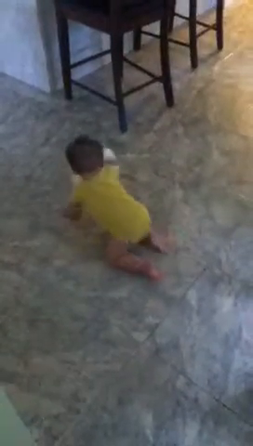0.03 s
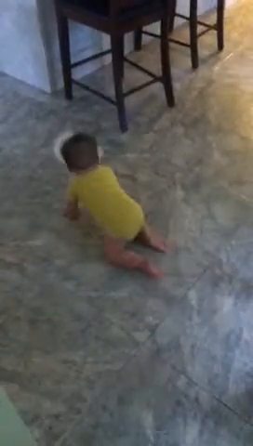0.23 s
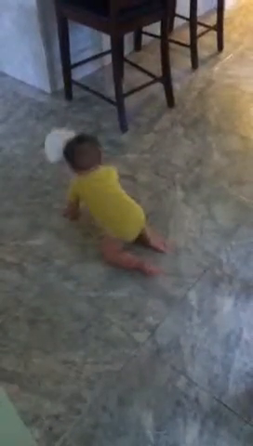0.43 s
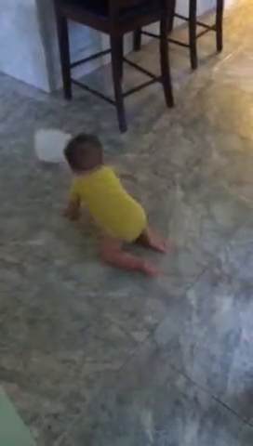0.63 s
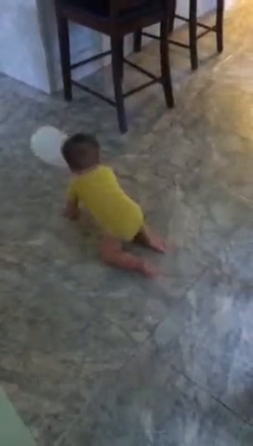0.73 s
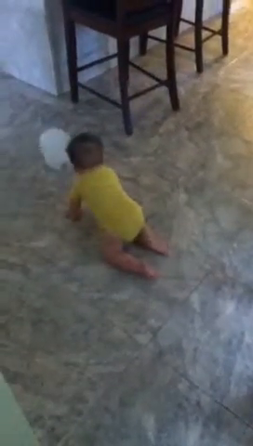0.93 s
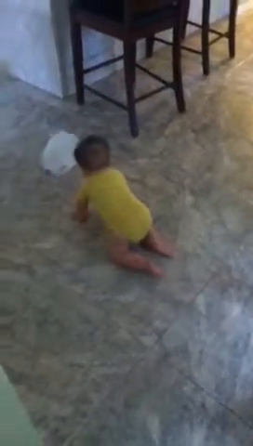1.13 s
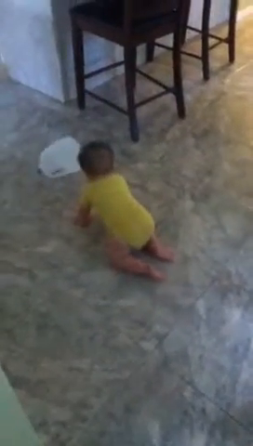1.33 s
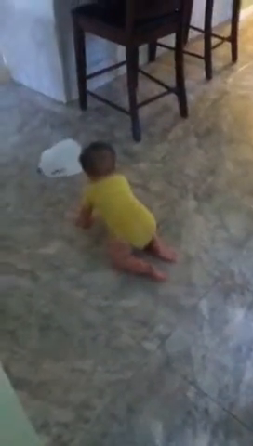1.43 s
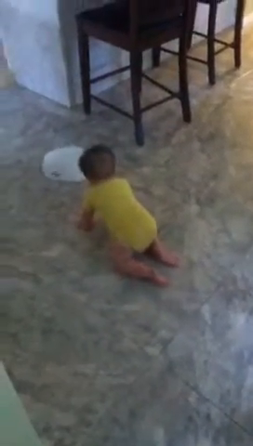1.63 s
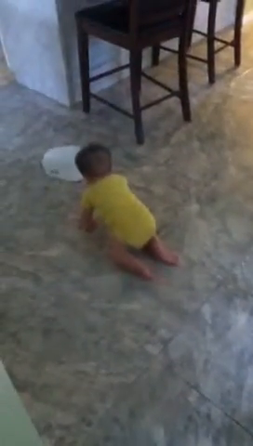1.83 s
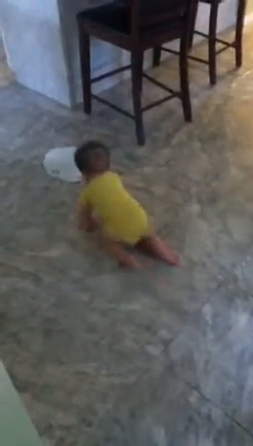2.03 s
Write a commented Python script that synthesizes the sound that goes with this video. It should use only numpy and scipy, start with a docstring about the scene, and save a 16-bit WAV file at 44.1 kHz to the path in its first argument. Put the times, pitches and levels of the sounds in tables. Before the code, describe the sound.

Dried beans rattle inside a plastic jug, starting suddenly at about 0.2 seconds as it rolls over concrete. Loud surges with sharp clacks and hollow bumps continue until 1 second. The jug then swings round more quietly, with a gritty scrape, a faint sinking tone and a few clacks. From 1.5 seconds it settles with tiny scuffs, and the room's echo fades to a faint low hum by 2 seconds.

```python
"""A jug of beans on concrete

A plastic jug with dried beans in it is pushed over a concrete floor in a hard, ringing room.
The beans tumble against its wall in surges, bright when they fall and duller when they slide.
The jug bumps and booms hollowly, swings round and comes to rest. The echo fades to a low hum."""
import sys
import numpy as np
from scipy import signal
from scipy.io import wavfile

SR = 44100
rng = np.random.default_rng(int(sys.argv[2]) if len(sys.argv) > 2 else 0)


def wav_record(signal):
    """Record a signal, one row per channel, as 16-bit PCM in the file named by sys.argv[1]."""
    frames = np.transpose(np.atleast_2d(signal))
    bounded = np.clip(frames, -1, 1)
    # unit amplitude maps onto the largest positive 16-bit level
    quanta = np.round(bounded * 32767).astype(np.int16)
    wavfile.write(sys.argv[1], SR, quanta)


N = 92610
T = np.arange(N) / SR
START_S = 0.2196   # the push that sets the jug rolling
BAND_EDGES_HZ = np.append(np.geomspace(25, 4500, 20), [5700, 7200, 8800, 10500, 12200, 14000, 16500])
BAND_CENTRES_HZ = np.sqrt(BAND_EDGES_HZ[1:] * BAND_EDGES_HZ[:-1])
HITS_PER_S = 2200   # bean hits when the tumbling is at its loudest


# How the beans tumble: (time [s], level [dB], brightness [dB per octave])
TUMBLE = [(.22, -21.5, -1), (.24, -21.5, 0), (.275, -12, -0.4), (.325, -13, -3), (.36, -12, -0.25),
          (.455, -14, -0.7), (.49, -20.5, -5.5), (.57, -16, -1.5), (.645, -18.5, 1), (.675, -11.5, -0.1),
          (.72, -11, 0.1), (.765, -17, -.2), (.83, -16, -0.5), (.875, -12.5, 1.5), (.91, -18, -0.3),
          (.99, -17, -0.5), (1.06, -25, -1.1), (1.14, -23, 0), (1.2, -23.5, -0.3), (1.275, -23.5, -1.5),
          (1.34, -24, 0), (1.42, -27, -0.8), (1.48, -36.5, -1.5), (1.62, -41, -2.5), (1.85, -69.5, 8.5)]
def beans(showers_db, spots):
    """Beans land on one of several spots on the wall. Harder tumbling gives more and louder ticks."""
    level_db, brightness = curves(TUMBLE)
    per_s = HITS_PER_S / spots * from_db(0.3 * (level_db - level_db.max()))
    strength = from_db(level_db + showers_db - 3) * (T >= START_S)
    hits = clicks(per_s, spread_db=2.5) * strength + clacks()
    return bean_ticks(hits, brightness) / np.sqrt(spots)


# Hard clacks that stand out from the rattle: (time [s], level [dB])
CLACKS = [(0.266, 2.5), (0.339, -24), (0.402, -4), (0.6146, -8), (0.66, -11), (0.709, -1), (0.721, -2),
          (.882, -7), (1.1568, -14), (1.202, -4), (1.2922, -3), (1.3377, -2.5), (1.366, -14)]
def clacks():
    """A bean hits hard: a burst of clicks so short that it sounds like one clack."""
    bursts = sum(from_db(db - 12) * fade_from(start, decay_s=0.0025) for start, db in CLACKS)
    return clicks(HITS_PER_S, spread_db=0) * bursts


# The tone of a bean striking the wall: (frequency [Hz], level [dB])
BEAN_TONE = [(250, -4.5), (400, -4), (550, -5.5), (800, 3), (1100, -1.5), (1450, 3), (2000, -1),
             (3000, -0.5), (4000, -3), (5100, -6), (6400, -10), (8000, -11.5), (9600, -14.5), (11300, -20),
             (13000, -25.5), (15200, -36)]
def bean_ticks(hits, brightness, pivot_hz=1940, spread_db=3.0):
    """Each hit on the plastic becomes a tick with its own random mix of low and high sound."""
    when = np.flatnonzero(hits)
    out, power = 0, 0
    for low, high, hz in zip(BAND_EDGES_HZ, BAND_EDGES_HZ[1:], BAND_CENTRES_HZ):
        if hz > BEAN_TONE[0][0]:
            chance = rng.uniform(-1, 1, N)[when]
            colour = np.sign(chance) * unit_level(from_db(spread_db * np.sqrt(12) * abs(chance)))
            tilt = from_db(brightness[when] * np.log2(hz / pivot_hz))   # a seesaw of bass and treble
            ticks = np.zeros(N)
            ticks[when] = hits[when] * colour * tilt
            gain = from_db(at_hz(BEAN_TONE, hz))
            out = out + gain * band(ticks, low, high)
            power += gain ** 2 * (high - low) * 2 / SR
    return out / np.sqrt(power)


# How hard the rolling jug drums on the floor: (time [s], level [dB])
ROLLING = [(.218, -22.5), (.25, -21.5), (.33, -30.5), (.38, -21.5), (.5, -21.5), (.6, -22), (.72, -24.5),
           (.87, -21.5), (.93, -30.5), (1.08, -35), (1.22, -31), (1.38, -41), (1.47, -53), (1.63, -44.5),
           (1.75, -63)]
# The notes of the hollow jug: (pitch [Hz], level [dB], time to fade by 60 dB [s])
JUG_NOTES = [(132.5, -12.5, 0.3), (163.6, -3.5, 0.34), (207.7, -1, 0.15), (247.6, 0.5, 0.3),
             (275, -5.5, 0.58), (309.3, 4, 0.31), (358.6, -1, .2), (400.3, 1.5, 0.14), (431, -20.5, 0.38),
             (604, -19, 0.22), (794.7, -2.5, 0.56), (1309, -19.5, 0.16), (1583, -18.5, 0.062)]
def jug_ring():
    """The small knocks of rolling keep the hollow jug ringing."""
    knocks = clicks(per_s=500, spread_db=2.5) * from_db(curves(ROLLING)[0]) * (T >= START_S)
    out = 0
    for hz, db, ring_s in JUG_NOTES:
        kept = from_db(-60 / (ring_s * SR))   # share of the ring left after one sample
        angle = 2 * np.pi * hz / SR
        gain = np.sin(angle) * np.sqrt(2 * (1 - kept ** 2))
        feedback = [1, -2 * kept * np.cos(angle), kept ** 2]
        pushes = knocks * rng.standard_normal(N) + 1e-18
        out = out + from_db(db) * signal.lfilter([0, gain], feedback, pushes)
    cut_rumble = signal.butter(4, 115, "high", fs=SR, output="sos")
    return signal.sosfilt(cut_rumble, out) / np.sqrt(len(JUG_NOTES))


# Low tones that start and fade: (time [s], level [dB], pitch [Hz], time to fade by 60 dB [s])
LOW_TONES = [(0.221, -14, 214, 0.055), (0.24, -18.5, 251, 0.14), (0.291, -13.5, 269, 0.088),
             (0.339, -22, 168, 0.67), (0.44, -19, 213, 0.078), (.436, -12, 442.5, .18),
             (0.497, -10, 327, 0.081), (0.506, -9, 446.6, 0.09), (.533, -9, 228.7, 0.11),
             (0.572, -15, 208, 0.11), (.648, -26, 145.6, 0.14), (.652, -14, 220, 0.1),
             (0.679, -19.5, 160, 0.17), (.718, -14.5, 315, 0.33), (0.787, -21.5, 151.6, 0.18),
             (.835, -12.5, 317, 0.22), (1.205, -20.5, 309, 0.22), (1.48, -49, 95.1, 0.96),
             (1.598, -37, 260, .15)]
def low_tones(rise_s=0.0056):
    """The jug's brief booms as it bumps along, and a faint low hum near the end."""
    out = 0
    for start, db, hz, ring_s in LOW_TONES:
        age = np.maximum(T - start, 0)
        shape = (1 - np.exp(-age / rise_s)) * fade_from(start, ring_s / np.log(1000))
        out = out + from_db(db) * shape * np.sin(2 * np.pi * hz * age)
    return out


# The note of the swinging jug: (time [s], pitch [Hz], level [dB])
RIM_NOTE = [(1.04, 309.9, -45.5), (1.13, 300.7, -34.5), (1.2, 296.2, -40), (1.28, 269.5, -35.5),
            (1.36, 276, -33.5), (1.45, 265, -45), (1.52, 266, -59)]
# The tones inside that note: (multiple of the pitch [ratio], level [dB])
RIM_TONES = [(.5, -9), (1, 0.5)]
def rim_swing(roughness=0.38, waver_hz=30):
    """The hollow wall sings a slightly rough, sinking note as the jug swings round on its rim."""
    hz, db = curves(RIM_NOTE)
    phase = 2 * np.pi * np.cumsum(hz) / SR
    smooth = signal.butter(2, waver_hz, fs=SR, output="sos")
    out = 0
    for multiple, tone_db in RIM_TONES:
        swell, slip = roughness * unit_level(signal.sosfilt(smooth, rng.standard_normal((2, N))))
        out = out + from_db(db + tone_db) * (1 + swell) * np.sin(multiple * phase + slip)
    return out * (T > RIM_NOTE[0][0]) * (T < RIM_NOTE[-1][0])


# Short, gritty scrapes: (time [s], level [dB], decay time [s], middle frequency [Hz])
SCRAPES = [(1.076, -26.5, 0.066, 1560), (1.715, -46.5, 0.074, 1324), (1.905, -49.5, 0.048, 2120)]
def scrapes(width_ratio=1.35):
    """Beans slide along the wall as the jug swings, then come faint scuffs as it settles."""
    grit = clicks(per_s=2000, spread_db=6.5)
    out = 0
    for start, db, decay_s, hz in SCRAPES:
        scrape = unit_level(band(grit, hz / width_ratio, hz * width_ratio))
        out = out + from_db(db) * fade_from(start, decay_s) * scrape
    return out


# How long the room rings: (frequency [Hz], time to fade by 60 dB [s])
ROOM_RING = [(120, 0.66), (400, 0.62), (1300, 1.0), (3500, .9), (8000, 0.79), (15000, .45)]
def room_echo(sound, early_fade_s=0.11, tail_delay_s=0.004):
    """Quick echoes off the jug and floor, then a wash of echoes whose highest treble dies first."""
    t, tail = T[:SR], 0
    for low, high in zip(BAND_EDGES_HZ[::2], BAND_EDGES_HZ[2::2]):
        fade_rate = np.log(1000) / at_hz(ROOM_RING, np.sqrt(low * high))
        tail = tail + noise(low, high, SR) * np.exp(-fade_rate * t) * np.sqrt(2 * fade_rate / SR)
    early = rng.standard_normal(SR) * from_db(-60 * t / early_fade_s)
    early = unit_level(early) / np.sqrt(SR)
    echoes = from_db(-6) * early + from_db(-3.5) * tail * (t > tail_delay_s)
    return signal.fftconvolve(sound, echoes)[:N]


# The room's steady hush: (frequency [Hz], level [dB])
HUSH = [(18, -54), (30, -22), (137, -2.5), (270, -8), (299, -3.5), (443, -17), (673, -11), (787, -20),
        (852, -16.5), (2240, -28), (15500, -45)]
# The notes of the room's hum: (pitch [Hz], level [dB], width [Hz])
HUM_NOTES = [(92, -4.5, 13), (190, -1, 13.6), (269, -13, 27)]
# How the hum swells and eases: (time [s], level [dB])
HUM_SWELL = [(0, -71), (1.4, -58.5), (1.78, -50.5), (2.1, -56.5)]
def background():
    """The room's soft hush, its low unsteady hum and a faint, high hiss."""
    bands = np.array([noise(low, high) for low, high in zip(BAND_EDGES_HZ, BAND_EDGES_HZ[1:])])
    hush = from_db(-53.5) * unit_level(from_db(at_hz(HUSH, BAND_CENTRES_HZ)) @ bands)
    hum = 0
    for hz, db, width in HUM_NOTES:
        hum = hum + from_db(db) * unit_level(noise(hz - width / 2, hz + width / 2))
    hiss = from_db(-63.5) * unit_level(noise(2200, 12000))
    return hush + hum * from_db(curves(HUM_SWELL)[0]) + hiss


def clicks(per_s, spread_db):
    """Random clicks, many small and a few large, with the same average power at any rate."""
    sizes = unit_level(from_db(spread_db * np.minimum(rng.exponential(1, N), 4)))
    return (rng.random(N) < per_s / SR) * sizes * np.sqrt(SR / per_s)


def noise(low, high, samples=N):
    """Noise between two frequencies in Hz."""
    return band(rng.standard_normal(samples), low, high)


def band(sound, low, high):
    """Keep the part of a sound between two frequencies in Hz."""
    return signal.sosfilt(signal.butter(2, [low, high], "band", fs=SR, output="sos"), sound + 1e-18)


def fade_from(start, decay_s):
    """Jump to 1 at the start, then fall to about a third every decay_s seconds."""
    return (T >= start) * np.exp(-abs(T - start) / decay_s)


def curves(table):
    """Join a table's points in time, giving one curve for each column after the first."""
    times, *columns = np.transpose(table)
    return [np.interp(T, times, column) for column in columns]


def at_hz(table, hz):
    """Read a table at any frequency, with the octaves evenly spaced."""
    frequencies, values = np.transpose(table)
    return np.interp(np.log(hz), np.log(frequencies), values)


def from_db(db):
    """Turn decibels into a number to multiply by."""
    return 10 ** (np.asarray(db) / 20)


def unit_level(sound):
    """Scale a sound so that its average power is 1."""
    return sound / np.sqrt(np.mean(sound ** 2) + 1e-20)


def scene(spots=4, showers_per_s=45):
    """The rattling, booming jug in its room, the same on the left and the right."""
    # Beans land in little showers, so their level flutters.
    showers_db = 1.21 * np.interp(T * showers_per_s, np.arange(N), rng.standard_normal(N))
    rattles = [beans(showers_db, spots) for _ in range(spots)] + [scrapes()]
    boom = jug_ring() + low_tones() + rim_swing()
    # Each spot on the wall reaches the room in its own way, so each gets its own echo.
    rattle = sum(from_db(-5.5) * sound + room_echo(sound) for sound in rattles)
    mono = rattle + boom + from_db(-8.5) * room_echo(boom) + background()
    return np.array([mono, mono])


def record(dry, cutoff_hz=15700):
    """Cut away the very highest treble."""
    return signal.sosfilt(signal.ellip(10, .1, 80, cutoff_hz, fs=SR, output="sos"), dry)


dry = scene()
out = record(dry)
wav_record(out)
```